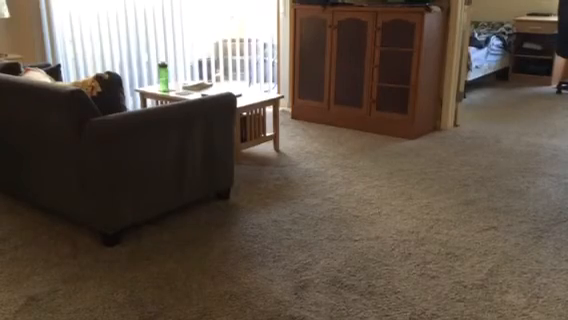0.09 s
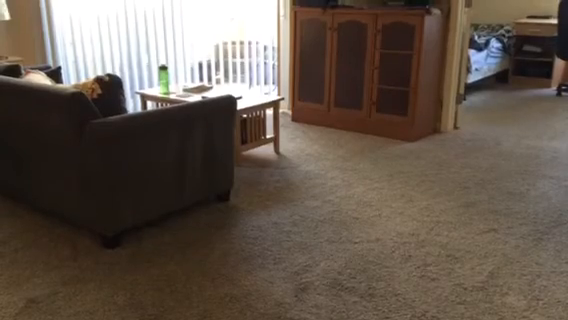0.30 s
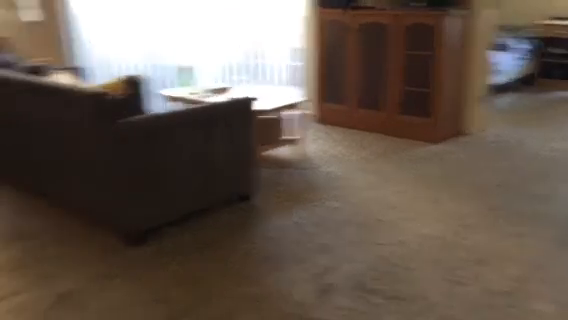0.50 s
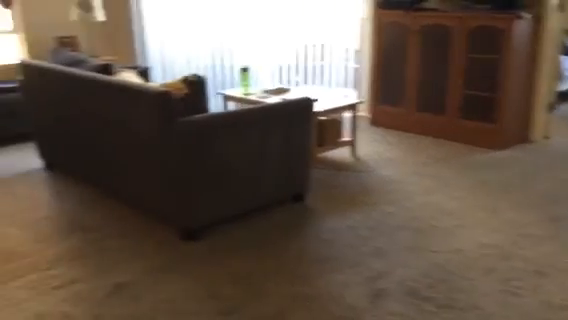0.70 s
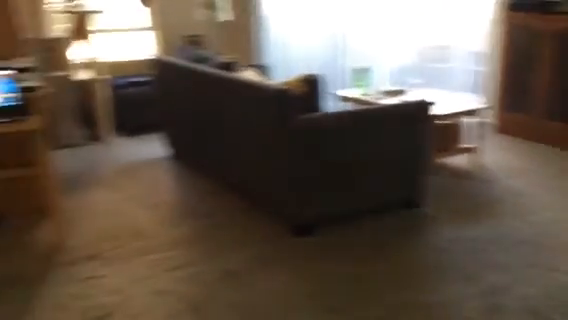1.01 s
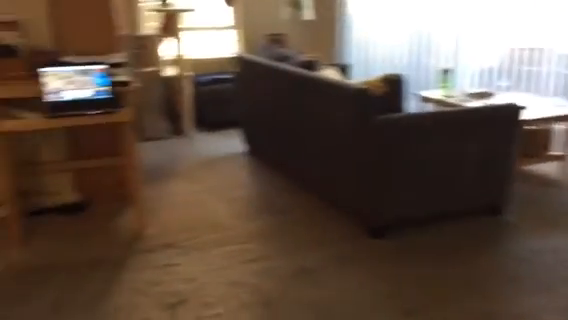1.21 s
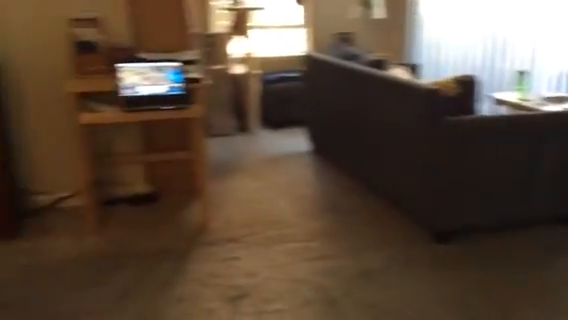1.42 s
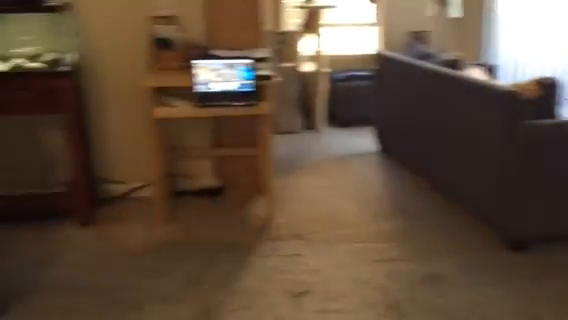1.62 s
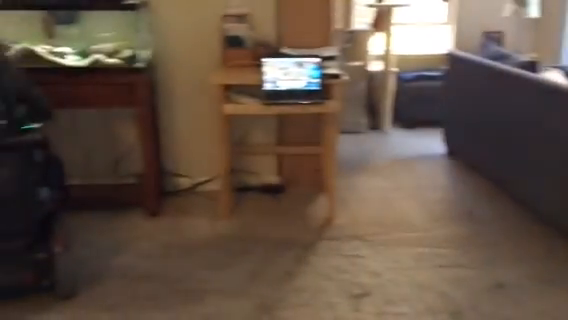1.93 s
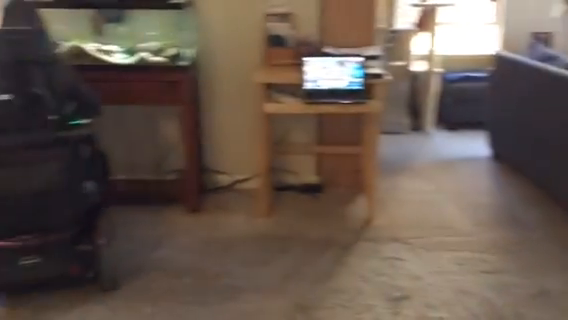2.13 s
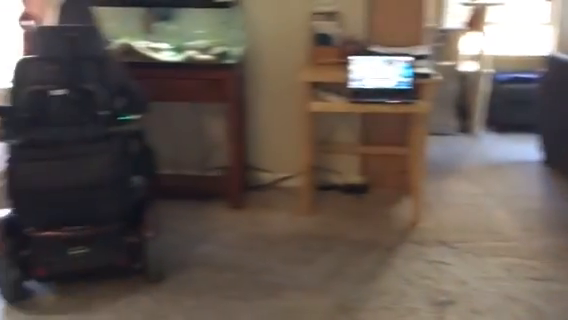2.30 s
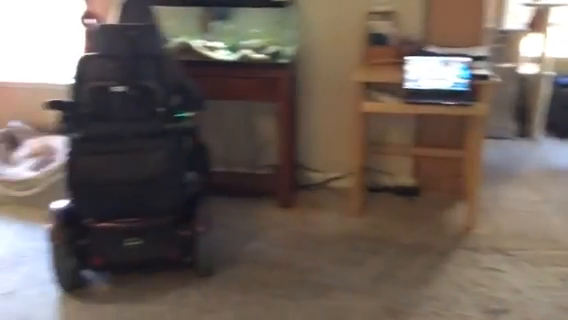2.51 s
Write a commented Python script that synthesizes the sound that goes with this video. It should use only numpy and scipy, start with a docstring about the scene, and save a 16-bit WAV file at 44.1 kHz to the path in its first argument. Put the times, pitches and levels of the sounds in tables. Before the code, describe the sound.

Electric wheelchair driving in a carpeted room: hard clicks early, then wavering motor hiss and deepening hum over soft rumble, while the hand gripping the phone microphone bumps, rubs, creaks and brushes cloth close by.

```python
"""Power wheelchair on carpet

A power wheelchair drives in a living room: uneven hiss, low hum and tyre rumble, from shaped noise and sines.
Sharp clicks, mostly in the first second, are impulses and noise spread by all-pass filters.
Close by, the grip on a hand-held phone knocks, scrapes, creaks and squeaks: damped modes and filtered slips.
Cloth brushes past as swells of noise; a faint short room tail follows the hits."""
import sys
import numpy as np
from scipy import signal
from scipy.fft import rfft, irfft, next_fast_len
from scipy.io import wavfile
from scipy.ndimage import uniform_filter1d, map_coordinates

SR = 44100
rng = np.random.default_rng(int(sys.argv[2]) if len(sys.argv) > 2 else 0)


def bounce(signal):
    """Save signal as a 16-bit WAV file at the path given by the first command-line argument."""
    frames = np.transpose(np.atleast_2d(signal))
    limited = np.clip(frames, -1, 1)
    pcm = np.round(limited * 32767).astype(np.int16)
    wavfile.write(sys.argv[1], SR, pcm)


N = 116865

# Spectrum of the case's ticks and crackle. Each row: frequency in Hz, gain in dB.
TICK_BODY = [(200, 12.5), (600, -11), (1000, 13.5), (1250, -0.5), (1550, 10), (1800, 10), (2150, 15),
             (3300, 2), (4200, -18), (5200, -2), (9000, -16.5), (15000, -39)]


def undb(db):
    """Decibels to gain."""
    return 10 ** (np.asarray(db) / 20)


def unit(x):
    """Scale to an rms of one."""
    return x / np.sqrt(np.mean(x ** 2) + 1e-18)


def set_hit_level(x, db):
    """Scale a short sound so that its energy, averaged over 20 ms, has this level."""
    return x * undb(db) / np.sqrt(np.sum(x ** 2) / (.02 * SR) + 1e-18)


def clock():
    """Time of every sample in seconds."""
    return np.arange(N) / SR


def curve(rows):
    """Gain interpolated in dB along (s, dB) points."""
    return undb(np.interp(clock(), *np.array(rows).T))


def colour(x, points, tilt_db=0):
    """Minimum-phase filter through (Hz, dB) points, tilted in dB per octave about 1448 Hz."""
    size = next_fast_len(len(x) + 4096, real=True) // 2 * 2
    octave = np.log2(np.maximum(np.arange(size // 2 + 1) * SR / size, 10))
    hz, db = np.array(points).T
    gain_db = np.interp(octave, np.log2(hz), db) + tilt_db * (octave - 10.5)
    # folding the cepstrum makes the filter causal
    cepstrum = irfft(np.log(undb(gain_db)))
    cepstrum[1:size // 2] *= 2
    cepstrum[size // 2 + 1:] = 0
    return irfft(rfft(x, size) * np.exp(rfft(cepstrum)))[:len(x)]


def ring(x, hz, width_hz):
    """One resonance, gain 1 at its centre."""
    return signal.lfilter(*signal.iirpeak(hz, hz / width_hz, fs=SR), x)


def walk(steps_per_s):
    """Smooth random wandering, spread a little under 1."""
    k = int(SR / steps_per_s)
    return uniform_filter1d(np.repeat(rng.standard_normal(N // k + 1), k), k)[:N]


def slips(per_s, scatter_db):
    """Tiny slips at random moments, of either sign and uneven size."""
    happens = rng.random(N) < per_s / SR
    return happens * rng.choice([-1, 1], N) * undb(scatter_db * rng.standard_normal(N))


def swell(start_s, attack_s, hold_s, release_s):
    """Straight-line attack, hold, release envelope."""
    corners_s = start_s + np.cumsum([0, attack_s, hold_s, release_s])
    return np.interp(clock(), corners_s, [0, 1, 1, 0])


def burst(decay_s, size=4096):
    """Exponentially fading noise of a rough contact, unit energy."""
    x = rng.standard_normal(size) * np.exp(-np.arange(size) / SR / decay_s)
    return x / np.linalg.norm(x)


def add(out, s, x):
    """Mix a short sound in at time s."""
    i = int(s * SR)
    out[i:i + len(x)] += x[:N - i]


def drive_hiss():
    """Hiss of the drive: coloured noise plus housing resonances of wavering pitch; its level flickers."""
    # Each row: time in s, level before flicker in dB.
    hiss_level = [(0, -72.5), (.2, -65), (.32, -63.5), (.43, -78.5), (.56, -51.5), (.7, -56.5), (.78, -64),
                  (.9, -56.5), (1.05, -53), (1.4, -54), (1.75, -48.5), (2.05, -54), (2.35, -52.5),
                  (2.65, -56.5)]
    # Each row: frequency in Hz, gain in dB.
    hiss_colour = [(120, -40), (200, -1.5), (248, -3), (350, -18), (419, 0), (451, -3), (550, -7.5),
                   (636, -10), (818, -22.5), (998, -10), (1150, -8), (1510, -19), (1600, -12), (1720, -5),
                   (2020, -10.5), (2700, -10), (3470, -11), (4810, -16), (6420, -15.5), (7020, -16),
                   (15000, -31)]
    # Each row: resonance in Hz, half the bandwidth of each filter pass in Hz, level in dB.
    housing = [(821.7, 45, -12), (1518, 55, -9.5), (2100, 76, -5.5), (6420, 130, -12), (9460, 350, -18.5)]
    wander_hz, wanders_per_s = 69.6, 18
    flicker_db, flickers_per_s = 2, 39.77
    hiss = unit(colour(rng.standard_normal(N), hiss_colour))
    for hz, half_width_hz, db in housing:
        width_hz = 2 * half_width_hz
        whine = unit(ring(ring(rng.standard_normal(N), hz, width_hz), hz, width_hz))
        # a wandering read position bends the pitch
        drift = np.cumsum(wander_hz / hz * walk(wanders_per_s))
        hiss = hiss + undb(db) * map_coordinates(whine, [np.arange(N) + drift], mode="mirror")
    return unit(hiss) * curve(hiss_level) * undb(flicker_db * walk(flickers_per_s))


def drive_hum():
    """Low hum: three harmonic sines with a wandering pitch and a flickering level."""
    # Each row: time in s, level before flicker in dB.
    hum_level = [(0, -74), (.2, -60), (.9, -60.5), (1.3, -54), (1.7, -57.5), (1.95, -55.5), (2.25, -48),
                 (2.65, -49)]
    # Each row: multiple of the fundamental, relative level in dB.
    partials = [(1, -5.5), (2, -21), (3, -32)]
    hum_hz, wander_ratio, wanders_per_s = 120.9, 0.011, 8.97
    flicker_db, flickers_per_s = 2.5, 22.04
    phase = 2 * np.pi * np.cumsum(hum_hz * (1 + wander_ratio * walk(wanders_per_s))) / SR
    hum = unit(sum(undb(db) * np.sin(round(k) * phase) for k, db in partials))
    return hum * curve(hum_level) * undb(flicker_db * walk(flickers_per_s))


def tyre_rumble():
    """Rumble of rolling: low coloured noise that rises and falls."""
    # Each row: time in s, level in dB.
    rumble_level = [(0, -56), (.1, -71.5), (.2, -46.5), (.45, -55), (.61, -44), (.74, -52), (.96, -59.5),
                    (1.2, -58), (1.42, -49), (1.6, -42.5), (1.79, -49), (1.92, -54.5), (2.27, -48.5),
                    (2.65, -56.5)]
    # Each row: frequency in Hz, gain in dB.
    rumble_colour = [(20, -48.5), (40, -33.5), (60, 1), (80, 0), (110, 3), (140, -3.5), (175, -13),
                     (250, -13), (320, -11.5), (500, -36.5), (1000, -46)]
    return unit(colour(rng.standard_normal(N), rumble_colour)) * curve(rumble_level)


def clicks():
    """Hard parts snap together; bending waves spread the snap over a millisecond, and it rings briefly."""
    # Each row: time in s, level in dB, noise decay in ms, tilt in dB per octave,
    # high ring in Hz, low ring gain in dB.
    click_rows = [(0.2209, -52.5, 0.46, -5.5, 6600, -1), (0.2354, -50, 0.63, -9.5, 6600, -13),
                  (0.2448, -32.5, 1.3, -3.5, 6560, 0), (0.248, -43.5, 1.8, -6.5, 6730, -1.5),
                  (0.255, -45, 0.36, -7, 6550, -2), (0.2594, -42, 2.5, 4.5, 6700, -7.5),
                  (0.3342, -27, 1.25, 3, 5720, -30), (0.5306, -38.5, 2.7, -8, 7000, -5),
                  (.535, -38, 2.3, -1.5, 6900, -13), (.5395, -43.5, 2.2, -3, 6400, -5),
                  (0.6236, -47, 3, -1, 6400, -15), (0.748, -56, 2.5, -5, 2950, 6),
                  (0.8436, -45.5, 2, -0.5, 6000, 12), (1.0288, -48.5, 1.53, 0, 3290, -20),
                  (2.0978, -57, 1, -4.5, 4330, 6)]
    # Ring of the clicking parts. Each row: frequency in Hz, gain in dB.
    click_body = [(60, -41), (300, -27), (1200, -13.5), (1650, -17), (2100, 11.5), (2900, 6), (3250, 1),
                  (3570, 9.5), (3950, -8), (4400, -4), (5100, -3.5), (6200, -8), (7100, -2.5), (7900, -8),
                  (9450, -0.5), (10000, -10), (11800, -20), (12700, -17.5), (15000, -33)]
    # All-pass centres in Hz.
    spread_centres = [2500, 4200, 6000, 7800, 9600]
    spread_width_hz = 1500
    grit_db, tail_db, tail_s = -4, -18, .004
    low_hz, low_width_hz = 1750, 540
    high_db, high_width_hz = 10, 300
    out = np.zeros(N)
    for s, db, decay_ms, tilt, high_hz, low_db in click_rows:
        grit = undb(grit_db) * np.sqrt(decay_ms) * burst(decay_ms / 1000)
        contact = grit + undb(tail_db) * burst(tail_s)
        contact[0] += 1
        for hz in spread_centres:
            # input minus twice its resonance is an all-pass
            contact = contact - 2 * ring(contact, hz, spread_width_hz)
        body = colour(contact, click_body, tilt)
        high = undb(high_db) * ring(body, high_hz, high_width_hz)
        low = undb(low_db) * ring(ring(contact, low_hz, low_width_hz), low_hz, low_width_hz)
        add(out, s, set_hit_level(body + high + low, db))
    return out


def knocks():
    """Hollow finger knocks ring a few damped modes of the phone."""
    # Each row: time in s, level in dB, pitch of the main mode in Hz.
    knock_rows = [(.206, -45, 254), (0.2243, -42.5, 588), (.229, -41.5, 266), (.383, -45.5, 539),
                  (0.416, -44, 459), (0.456, -49, 447), (0.5404, -43.5, 497), (0.751, -38.5, 414.4),
                  (0.7614, -51.5, 419), (1.74, -51, 580)]
    # Each row: ratio to the main pitch, gain in dB, 60 dB decay time in s.
    modes = [(0.319, -3, 0.091), (0.761, -8, 0.16), (0.999, 6.5, 0.036), (1.4, -5, 0.034),
             (1.85, -7.5, 0.032)]
    onset_s = 0.0018
    out, t = np.zeros(N), clock()[:SR // 4]
    for s, db, main_hz in knock_rows:
        knock = np.zeros(len(t))
        for ratio, mode_db, t60_s in modes:
            decay = np.exp(-np.log(1000) * t / t60_s)
            knock += undb(mode_db) * np.sin(2 * np.pi * main_hz * ratio * t) * decay
        add(out, s, set_hit_level(knock * (1 - np.exp(-t / onset_s)), db))
    return out


def bumps():
    """Soft low bumps only rock the phone: one damped sine each."""
    # Each row: time in s, level in dB, frequency in Hz, decay time constant in s.
    bump_rows = [(.135, -48, 111.5, 0.021), (0.214, -39.5, 106.3, 0.017), (0.378, -39, 66, 0.014),
                 (.523, -34.5, 88.5, 0.0072), (1.035, -37, 93, 0.0047), (1.059, -42, 65, .014),
                 (1.475, -35.5, 115, 0.035), (1.544, -39.5, 108.3, 0.055), (1.75, -36.5, 108, 0.012),
                 (1.791, -39.5, 116, 0.012)]
    onset_s = 0.00063
    out, t = np.zeros(N), clock()[:SR // 4]
    for s, db, hz, decay_s in bump_rows:
        envelope = np.exp(-t / decay_s) * (1 - np.exp(-t / onset_s))
        add(out, s, set_hit_level(np.sin(2 * np.pi * hz * t) * envelope, db))
    return out


def bend(x, delay_1khz_s):
    """Bending waves cross the case: the treble arrives first, the bass last."""
    hz = np.arange(len(x) + 1) * SR / (2 * len(x))
    # group delay goes as 1 / sqrt(frequency)
    phase = -4 * np.pi * delay_1khz_s * np.sqrt(1000 * hz)
    return irfft(rfft(x, 2 * len(x)) * np.exp(1j * phase))[:len(x)]


def creaks():
    """The case slips under the fingers: a tick that falls into a dull thud."""
    # Each row: time in s, tick level in dB, thud level in dB.
    creak_rows = [(.382, -52.5, -56.5), (0.418, -57.5, -69.5), (.655, -49, -72), (1.029, -56, -40.5),
                  (1.042, -44, -45.5), (1.144, -47.5, -41.5), (1.190, -53, -46.5), (1.218, -56.5, -49.5),
                  (1.260, -50, -44), (1.287, -64, -60), (1.322, -50.5, -51), (1.337, -57, -49.5),
                  (1.361, -54.5, -51.5), (1.387, -53.5, -59), (1.464, -55.5, -46.5), (1.694, -50.5, -52),
                  (1.737, -49, -41.5), (1.761, -51.5, -58), (2.1, -54.5, -50.5), (2.109, -55, -46)]
    # Each row: frequency in Hz, gain in dB.
    thud_body = [(30, -37), (70, 13), (130, 8), (220, -1), (330, -12), (430, 0.5), (700, -10), (1200, -40),
                 (4000, -55)]
    # Rings of the case after a tick. Each row: frequency in Hz, width in Hz, gain in dB.
    tick_rings = [(1070, 46, 5), (1424, 220, 1)]
    tick_s, tail_s, tail_db, thud_s = .0007, .002, -1.5, .003
    bend_s = .0027  # travel time at 1 kHz
    out = np.zeros(N)
    for s, tick_db, thud_db in creak_rows:
        slip = .5 * burst(tick_s) + undb(tail_db) * burst(tail_s)
        push = burst(thud_s)
        slip[0] += 1
        push[0] += 1
        tick = colour(slip, TICK_BODY)
        rings = sum(undb(db) * ring(tick, hz, width_hz) for hz, width_hz, db in tick_rings)
        tick = set_hit_level(tick + rings, tick_db)
        thud = set_hit_level(colour(push, thud_body), thud_db)
        add(out, s - bend_s / 2, bend(tick + thud, bend_s))
    return out


def crackle():
    """Loose crackle of the grip: sparse slips of very uneven size."""
    # Each row: start, attack, hold, release in s, level in dB.
    crackle_rows = [(0.19, 0.0072, 0.058, 0.03, -55.5), (1.65, 0.0087, 0.065, 0.099, -53)]
    per_s, scatter_db = 170, 11
    grains = unit(colour(slips(per_s, scatter_db), TICK_BODY))
    return grains * sum(swell(*times) * undb(db) for *times, db in crackle_rows)


def rubs():
    """Skin drags over the case in dense, uneven little slips that set it ringing."""
    # Each row: start, attack, hold, release in s, level in dB, brightness in dB per octave.
    rub_rows = [(0.191, 0.029, 0.037, 0.071, -50.5, 0.5), (0.313, 0.054, 0.12, 0.025, -50, -1.5),
                (0.428, 0.059, 0.17, 0.053, -43.5, 0.5), (0.524, 0.007, 0.0071, 0.016, -29, 7),
                (.538, 0.0072, 0.011, 0.014, -36.5, 1.5), (0.94, 0.09, 0.026, 0.019, -49, 1.5),
                (1.643, 0.024, 0.14, 0.053, -51, -1.5)]
    # Each row: frequency in Hz, gain in dB.
    rub_colour = [(35, -59), (60, -6), (115, 5.5), (170, -2), (381, 3.5), (564, -2.5), (1050, -7.5),
                  (1300, -16), (1490, -15), (1710, -15.5), (2150, -7), (4840, -24.5), (6680, -31.5),
                  (7330, -36), (15000, -56)]
    # Resonances of the case. Each row: frequency in Hz, width in Hz, level before brightness in dB.
    rub_rings = [(252, 10, -7.5), (390, 37, -11.5), (743, 50, -17), (1070, 52, -28), (1468, 31, -12),
                 (2240, 64, -17)]
    grains_per_s, scatter_db = 2600, 4.5
    stick_db, sticks_per_s = 2.5, 180
    out = np.zeros(N)
    for *times, db, tilt in rub_rows:
        drag = slips(grains_per_s, scatter_db) * undb(stick_db * walk(sticks_per_s))
        grit = unit(colour(drag, rub_colour, tilt))
        rings = np.zeros(N)
        for hz, width_hz, ring_db in rub_rings:
            rings += undb(ring_db + tilt * np.log2(hz / 1000)) * unit(ring(grit, hz, width_hz))
        out += unit(grit + rings) * swell(*times) * undb(db)
    return out


def squeak():
    """A finger drags and sets one mode of the case singing: noise through two resonances."""
    # Start, attack, hold, release in seconds.
    squeak_times = (.94, 0.036, 0.029, 0.016)
    level_db, hz, width_hz = -51.5, 405, 12
    tone = ring(ring(rng.standard_normal(N), hz, width_hz), hz, 4 * width_hz)
    return unit(tone) * swell(*squeak_times) * undb(level_db)


def brushes():
    """Cloth swishes: flickering noise, each with one broad resonance and a sheen around 8 kHz."""
    # Each row: start, attack, hold, release in s, level in dB, resonance in Hz,
    # resonance gain in dB, sheen gain in dB.
    brush_rows = [(0.028, 0.065, 0.065, 0.076, -50.5, 3000, 12.5, -1),
                  (0.073, 0.041, 0.021, 0.022, -55.5, 8100, 16, 3),
                  (1.657, 0.018, 0.012, 0.037, -41.5, 1980, -8, -19),
                  (1.781, 0.065, 0.011, 0.049, -46, 3730, 8, 2),
                  (1.863, 0.065, 0.032, 0.035, -51.5, 2750, 3, -33)]
    # Each row: frequency in Hz, gain in dB.
    brush_colour = [(150, -13), (430, 8.5), (720, 3.5), (930, 2), (1200, -5.5), (1650, 9), (2900, 6),
                    (4700, -1), (7600, -2), (9500, -4.5), (11500, -12.5), (15000, -13)]
    sheen_hz, sheen_width_hz = 8100, 11000
    flicker_db, flickers_per_s = 2.9, 410
    out = np.zeros(N)
    for *times, db, hz, peak_db, sheen_db in brush_rows:
        flicker = undb(flicker_db * walk(flickers_per_s))
        fibres = colour(rng.standard_normal(N) * flicker, brush_colour)
        peak = undb(peak_db) * ring(fibres, hz, 0.3 * hz)
        sheen = undb(sheen_db) * ring(fibres, sheen_hz, sheen_width_hz)
        out += unit(fibres + peak + sheen) * swell(*times) * undb(db)
    return out


def room_tail(hits):
    """The carpeted room: a faint short noise tail after the hits."""
    level_db, t60_s = -29.5, 0.17
    response = burst(t60_s / np.log(1000), size=16384)
    return undb(level_db) * signal.fftconvolve(hits, response)[:N]


def scene():
    """Sum of all sources, one channel; only the hits and crackle excite the room."""
    driving = drive_hiss() + drive_hum() + tyre_rumble()
    hits = clicks() + knocks() + bumps() + creaks() + crackle()
    handling = rubs() + squeak() + brushes()
    return (driving + hits + handling + room_tail(hits))[None]


def record(dry):
    """The phone drops the deepest bass and cuts the top of the treble."""
    low_cut_hz, top_hz = 39, 15300
    x = signal.sosfilt(signal.butter(2, low_cut_hz, "high", fs=SR, output="sos"), dry)
    return signal.sosfilt(signal.ellip(10, .2, 80, top_hz, fs=SR, output="sos"), x)


dry = scene()
out = record(dry)
bounce(out)
```